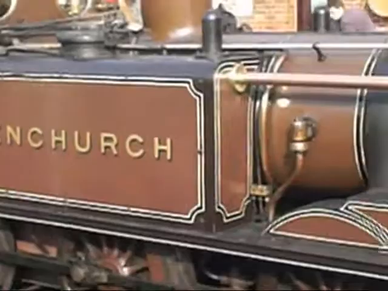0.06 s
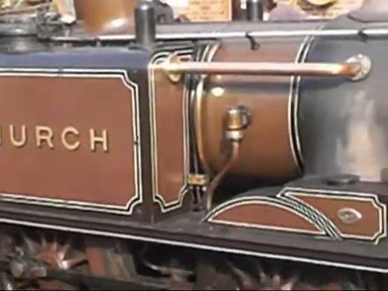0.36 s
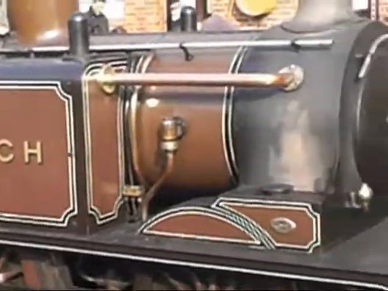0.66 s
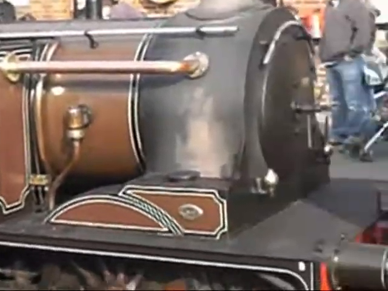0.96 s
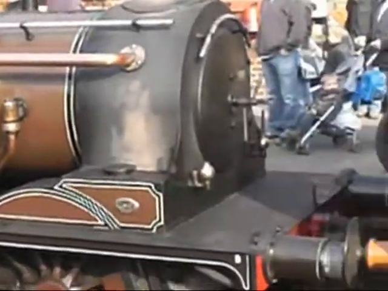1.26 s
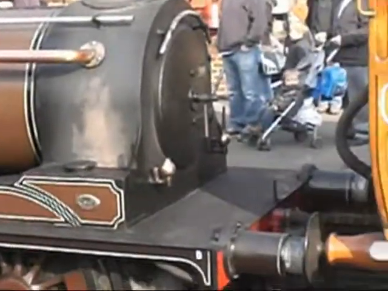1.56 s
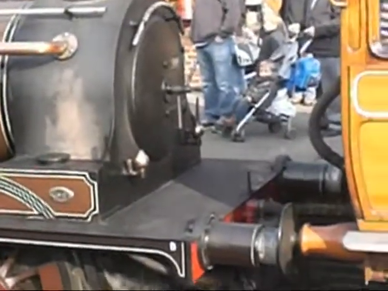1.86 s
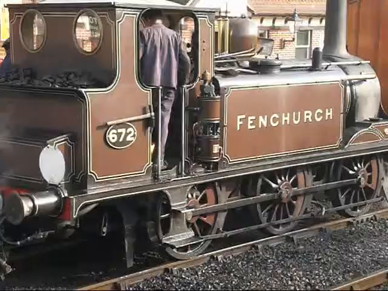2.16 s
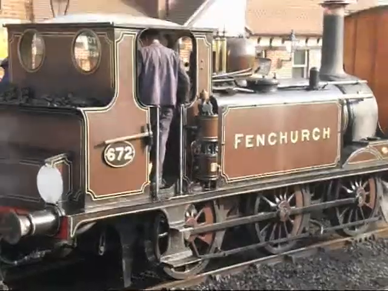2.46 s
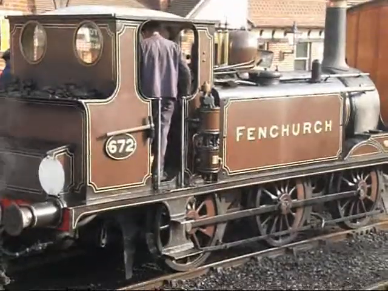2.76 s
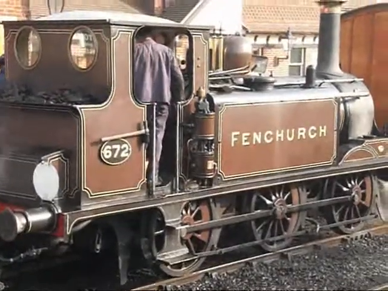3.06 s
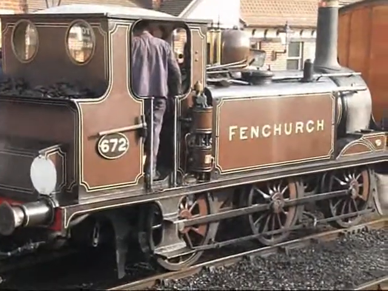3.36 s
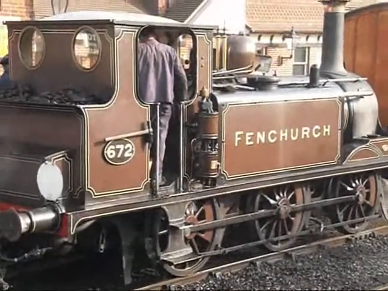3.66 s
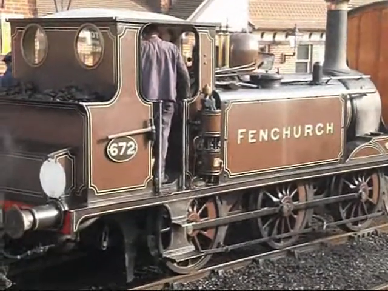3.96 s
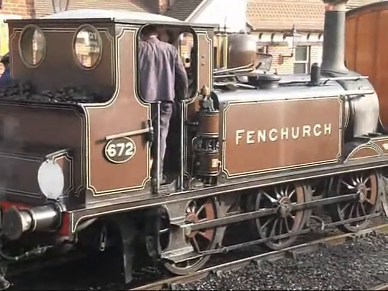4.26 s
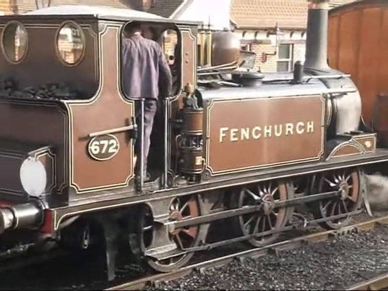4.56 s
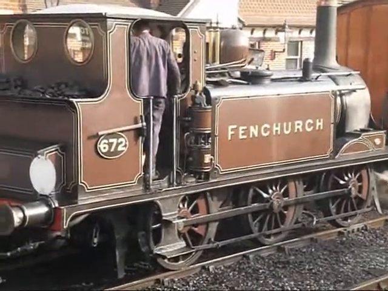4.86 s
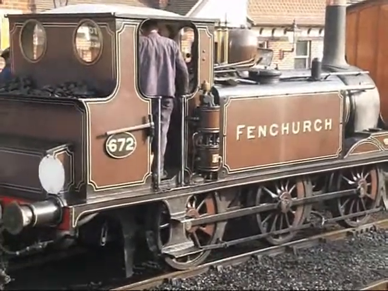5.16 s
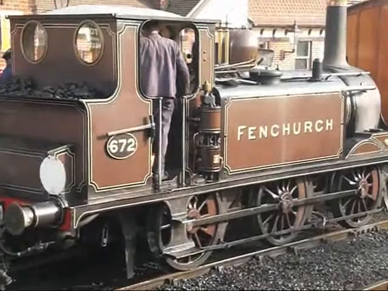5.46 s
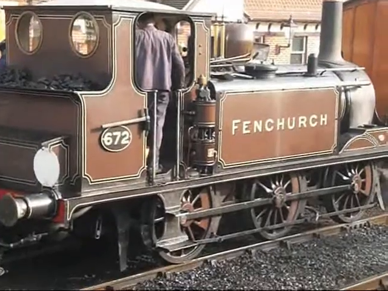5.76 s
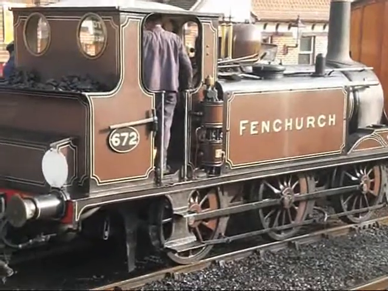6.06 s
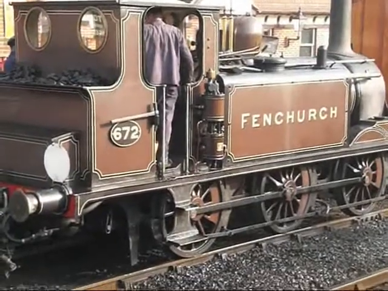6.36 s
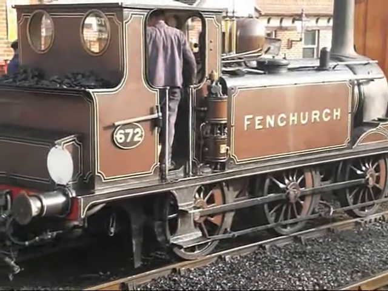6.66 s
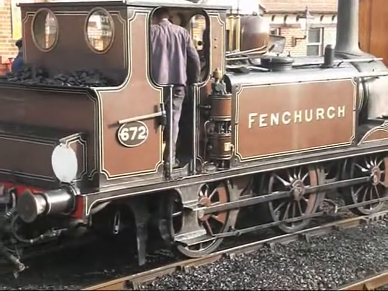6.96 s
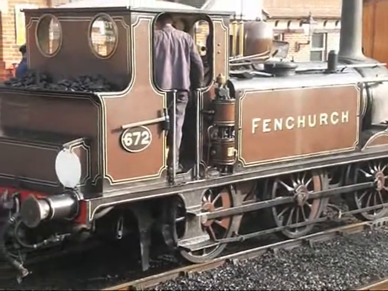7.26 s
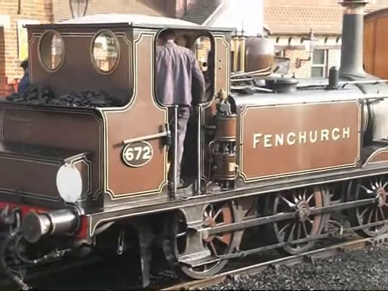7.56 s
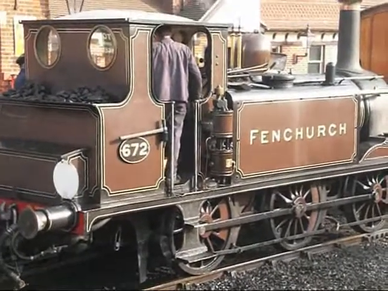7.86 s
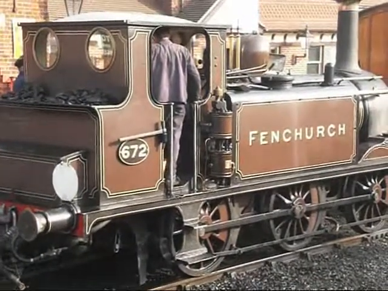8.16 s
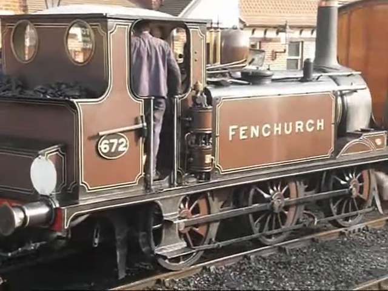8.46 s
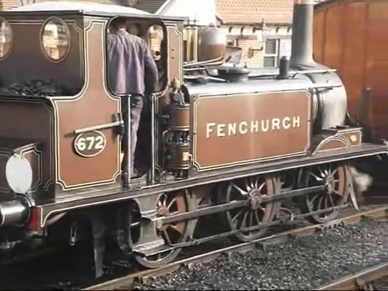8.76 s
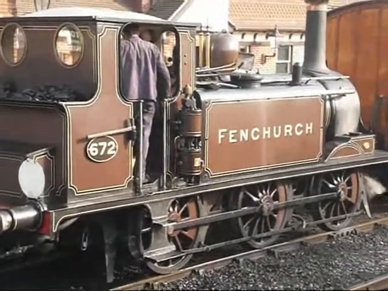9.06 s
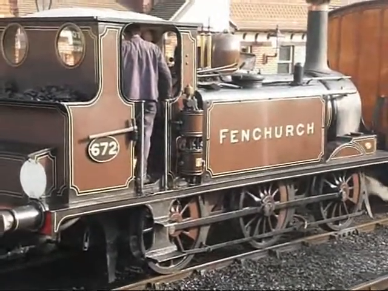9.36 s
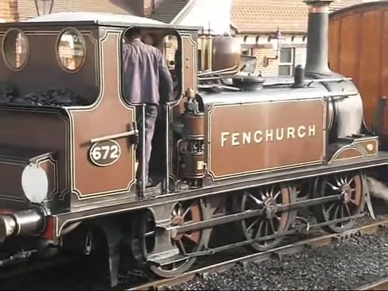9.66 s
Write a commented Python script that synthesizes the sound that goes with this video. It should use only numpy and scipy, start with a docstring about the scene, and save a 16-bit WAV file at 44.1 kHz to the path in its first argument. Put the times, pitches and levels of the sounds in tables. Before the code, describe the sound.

A standing steam locomotive blows off steam through its safety valves, heard close by at an open station platform. From the start there is a loud, shrill, sizzling hiss, topped by a thin, extremely high screech that wavers and falters briefly a few times. It overloads the microphone a little, adding a rasp, and the sizzle sharpens over the first second. At about 2.2 seconds the sound breaks off abruptly for a tenth of a second. At about 2.3 seconds the hiss comes straight back without the screech, now fuller and hollower, with more rush in the middle range and a faint metallic colour from the engine's pipes and plates. It stays loud and steady until the end at about 10 seconds, with only slight flutter and small swells as the plume moves in the air.

```python
"""Station platform: a standing steam locomotive blows off through its safety valves.
Beside the smokebox the turbulent jet is a shrill hiss topped by a wavering feedback screech,
loud enough to overload the microphone. The sound breaks off for 0.1 s and returns beside the cab,
fuller and hollower, coloured by the engine's pipes and plates, swaying as the plume moves in the air."""
import sys
import numpy as np
from scipy import signal
from scipy.fft import rfft, irfft
from scipy.io import wavfile

SR = 44100
rng = np.random.default_rng(int(sys.argv[2]) if len(sys.argv) > 2 else 0)


def store_wav(level_fs):
    """Save 16-bit WAV to argv[1]."""
    pcm = np.round(np.clip(np.atleast_2d(level_fs), -1, 1) * 32767)
    wavfile.write(sys.argv[1], SR, pcm.T.astype(np.int16))


N = 432170
TIME_S = np.arange(N) / SR
FREQS_HZ = np.maximum(np.arange(N // 2 + 1) * SR / N, 1)

# reflections off engine, platform and station wall: delay/s, gain/dB
ECHOES = [(0.00559, -22.8), (0.01719, -28.3), (0.02002, -27.8), (0.02447, -29.3), (0.03006, -29.6),
          (0.03128, -28.8)]
# jet ranges, rows sizzle, hiss, rush, roar: low f/Hz, high f/Hz
JET_RANGES = [(11000, 16000), (5000, 11000), (2000, 5000), (15, 2000)]
# spectral shape beside the cab: f/Hz, relative level/dB
CAB_COLOUR = [(20, -19), (120, -15.5), (320, -15), (540, -11.5), (800, -7.5), (1050, -2), (1550, -4),
              (3000, -1.5), (6000, -9), (9000, -8.5), (10400, -9.5), (12700, -8.5), (15600, -3)]
# pipe and plate resonances and hollows: f/Hz, width/Hz, gain/dB
CAB_RESONANCES = [(45, 5, 6.8), (360, 13, 8.3), (445, 28, 5.6), (555, 58, 6.4), (612, 16, 6.2),
                  (666, 66, 5.6), (766, 14, -3.9), (802, 12, 4.5), (1158, 22, 6.3), (1209, 10, -7.6),
                  (1261, 22, 6.0), (1376, 24, 3.1), (1501, 13, -7.0), (1827, 20, 8.3), (2920, 240, 3.0),
                  (3565, 250, 5.4), (4132, 179, 2.8), (4687, 321, 4.3), (5320, 577, 4.9), (6414, 378, 2.8),
                  (7017, 606, 5.5), (7710, 305, 2.9), (9127, 2060, 6.9), (11357, 1102, 4.2)]
# per jet range: mean relative level/dB, share of the plume's sway
CAB_LEVELS = [(-23, .15), (-20.5, 0.53), (-21, 0.6), (-26, 0.37)]
# plume sway, taken about its mean: t/s, level/dB
PLUME_SWAY = [(2.4, -17.5), (2.75, -16.5), (2.85, -20), (3.06, -16.5), (3.1, -20), (3.35, -17.5),
              (4.13, -17), (4.38, -20), (5.68, -19), (7.57, -18.5), (7.72, -16), (7.9, -20), (8.29, -20),
              (8.36, -18), (9.24, -19), (9.34, -22), (9.57, -17.5), (9.8, -20.5)]
# onset beside the cab: t/s, gain/dB
CAB_ONSET = [(2.325, -120), (2.334, -57), (2.3375, -24.5), (2.3385, -4), (2.365, 0), (2.39, 1.5)]
# spectral shape beside the smokebox: f/Hz, relative level/dB
SMOKEBOX_COLOUR = [(20, -29), (100, -27), (350, -21.5), (1100, -16.5), (2000, -15), (3000, -12),
                   (4000, -14.5), (5400, -16), (6800, -14.5), (9500, -13.5), (11600, -12), (13600, -2.7),
                   (14700, -2.5), (15600, -6)]
# per jet range: level outside the shrill beam/dB, change inside/dB
SMOKEBOX_LEVELS = [(-11, 2.5), (-19.5, -1), (-20, -2.5), (-28, 0.1)]
# break-off beside the smokebox: t/s, gain/dB
SMOKEBOX_BREAK = [(2.238, 0), (2.239, -23), (2.257, -30), (2.266, -70), (2.28, -120)]
# brief dips of the screech: t/s, length/s, gain/dB
SCREECH_FALTERS = [(0.755, 0.021, -4), (1.317, .02, -14), (1.496, .03, -4)]
# microphone notch: f/Hz, width/Hz, gain/dB
MICROPHONE_DIP = [(7225, 135, -13.5)]


def from_db(db):
    """Decibels to gain."""
    return 10 ** (np.asarray(db) / 20)


def unit_rms(x):
    """Scale to rms 1."""
    return x / np.sqrt(np.mean(x ** 2) + 1e-20)


def curve_db(points):
    """Level curve at every sample."""
    t_s, db = np.transpose(points)
    return np.interp(TIME_S, t_s, db)


def colour_db(points):
    """Spectral shape, interpolated over log frequency."""
    hz, db = np.transpose(points)
    return np.interp(np.log(FREQS_HZ), np.log(hz), db)


def bells_db(resonances):
    """Sum of bell-shaped lifts and dips."""
    return sum(db / (1 + (2 * (FREQS_HZ - hz) / width_hz) ** 2) for hz, width_hz, db in resonances)


def drift(rate_hz):
    """Random drift, rms 1: coarse noise through a double one-pole low-pass."""
    hop, settle = 40, 2000
    pole = np.exp(-2 * np.pi * rate_hz * hop / SR)
    noise = rng.standard_normal(N // hop + settle + 2)
    slow = signal.lfilter([1], [1, -2 * pole, pole * pole], noise)[settle:]
    return np.interp(np.arange(N) / hop, np.arange(len(slow)), unit_rms(slow))


def noise_floor(level_db=-80):
    """Faint white noise."""
    return from_db(level_db) * rng.standard_normal(N)


def reflections_db(cutoff_hz=8300):
    """Echoes ripple the spectrum of a steady hiss; rough surfaces return less treble."""
    returned = sum(from_db(db) * np.exp(-2j * np.pi * FREQS_HZ * delay_s) for delay_s, db in ECHOES)
    return 20 * np.log10(np.abs(1 + returned / (1 + (FREQS_HZ / cutoff_hz) ** 2)))


def eddies(shape_db, low_hz, high_hz, sway_db, flutter_db, bands=5):
    """Turbulence in one range, rms 1; eddies of each size swell and flutter independently."""
    spectrum = rfft(rng.standard_normal(N)) * from_db(shape_db)
    edges_hz = np.linspace(low_hz, high_hz, bands + 1)
    turbulence = np.zeros(N)
    for from_hz, to_hz in zip(edges_hz, edges_hz[1:]):
        band = irfft(spectrum * ((FREQS_HZ >= from_hz) & (FREQS_HZ < to_hz)), N)
        turbulence += band * from_db(sway_db * drift(2.4) + flutter_db * drift(27))
    return unit_rms(turbulence)


def jet(shape_db, levels_db, sway_db, flutter_db, sputter_db):
    """Fine eddies at the valve lip sizzle, larger ones hiss and rush, the plume roars."""
    steam = sum(from_db(db) * eddies(shape_db, low_hz, high_hz, sway_db, flutter_db)
                for db, (low_hz, high_hz) in zip(levels_db, JET_RANGES))
    return steam * from_db(sputter_db * drift(49))  # wet steam: all ranges sputter together


def screech(centre_hz=14612, wander_hz=38, jitter_hz=85, flutter_db=1.4):
    """The choked jet feeds back on the valve lip: one unsteady tone that falters now and then."""
    pitch_hz = centre_hz + wander_hz * drift(22) + jitter_hz * drift(260)
    tone = np.sin(2 * np.pi * np.cumsum(pitch_hz) / SR)
    tone = unit_rms(tone * from_db(flutter_db * drift(70)))
    falter_db = sum(db * np.exp(-(2 * (TIME_S - t_s) / length_s) ** 2)
                    for t_s, length_s, db in SCREECH_FALTERS)
    return tone * from_db(falter_db)


def jet_beside_cab():
    """Fuller side: rings in pipes and plates, echoes off the station, sways with the plume."""
    shape_db = colour_db(CAB_COLOUR) + bells_db(CAB_RESONANCES) + reflections_db()
    plume_db = curve_db(PLUME_SWAY)
    levels_db = [db + share * (plume_db - plume_db.mean()) for db, share in CAB_LEVELS]
    steam = jet(shape_db, levels_db, sway_db=0.46, flutter_db=0.42, sputter_db=0.26)
    return steam * from_db(curve_db(CAB_ONSET))


def jet_beside_smokebox(into_beam_s=1.13, screech_share_db=-3.5):
    """Shrill side: the listener comes round into the jet's beam; sizzle grows, hiss recedes."""
    in_beam = np.clip(TIME_S / into_beam_s, 0, 1)
    sizzle_db, *lower_db = [db + change_db * in_beam for db, change_db in SMOKEBOX_LEVELS]
    share = from_db(screech_share_db) ** 2  # sizzle power taken by the screech
    levels_db = [sizzle_db + 10 * np.log10(1 - share), *lower_db]
    steam = jet(colour_db(SMOKEBOX_COLOUR), levels_db, sway_db=0.5, flutter_db=0.43, sputter_db=0.34)
    tone = from_db(sizzle_db) * np.sqrt(share) * screech()
    return (steam + tone) * from_db(curve_db(SMOKEBOX_BREAK))


def scene():
    """Smokebox, then cab, over the floor; both channels alike."""
    return np.tile(noise_floor() + jet_beside_smokebox() + jet_beside_cab(), (2, 1))


def record(dry, overload=0.65, cutoff_hz=15720):
    """Microphone: narrow dip, overload that spreads the shrill top down as a rasp, steep low-pass."""
    notched = irfft(rfft(dry) * from_db(bells_db(MICROPHONE_DIP)), N)
    clipped = notched / (1 + (notched / overload) ** 6) ** (1 / 6)
    return signal.sosfilt(signal.ellip(14, .1, 80, cutoff_hz, fs=SR, output="sos"), clipped)


dry = scene()
out = record(dry)
store_wav(out)
```